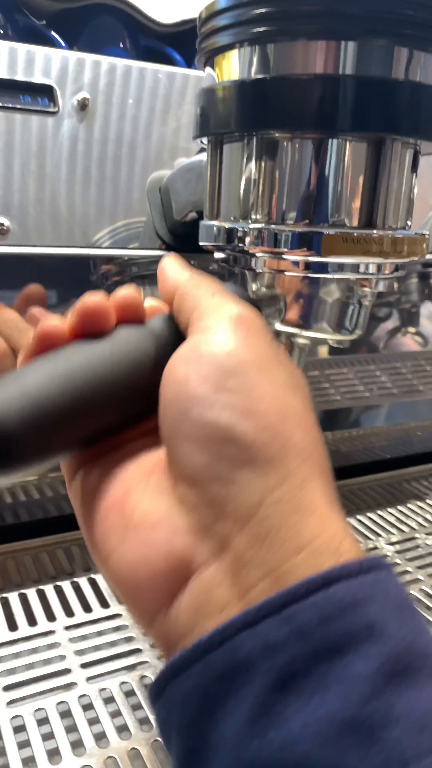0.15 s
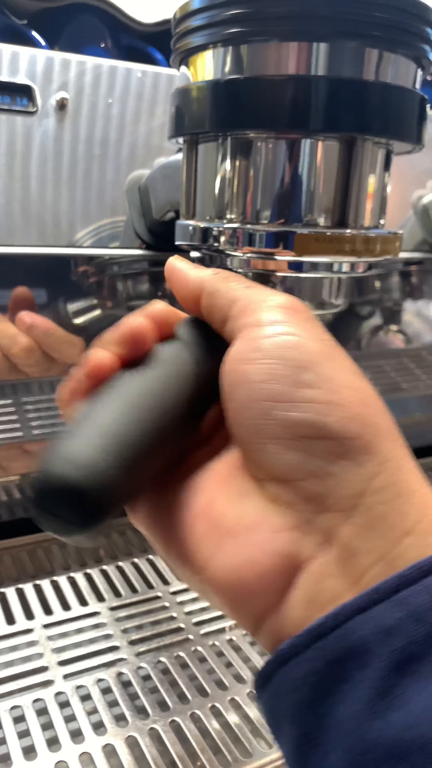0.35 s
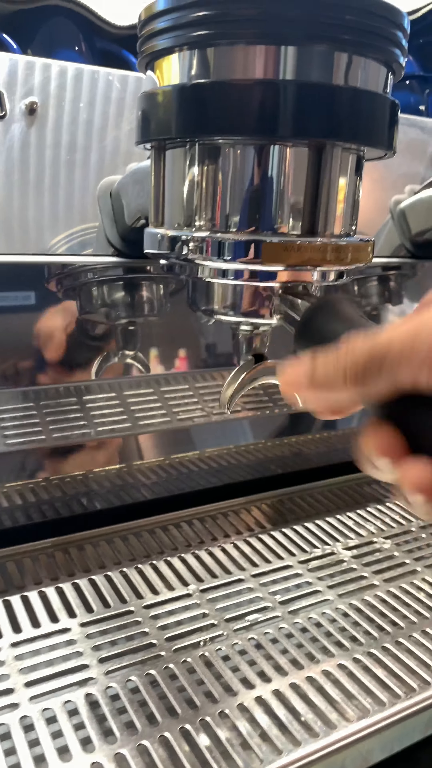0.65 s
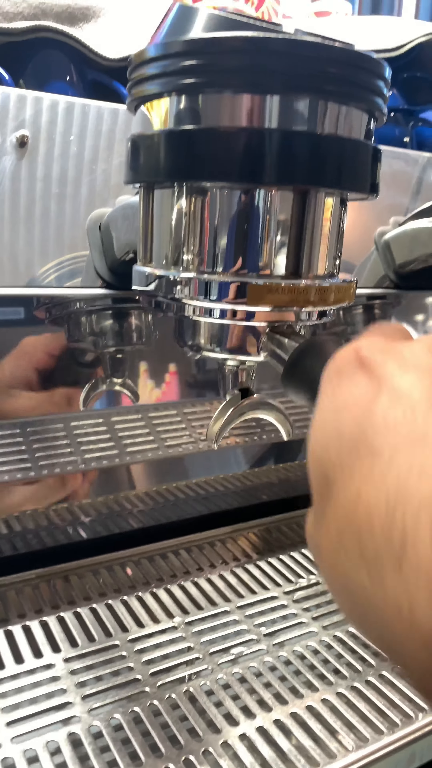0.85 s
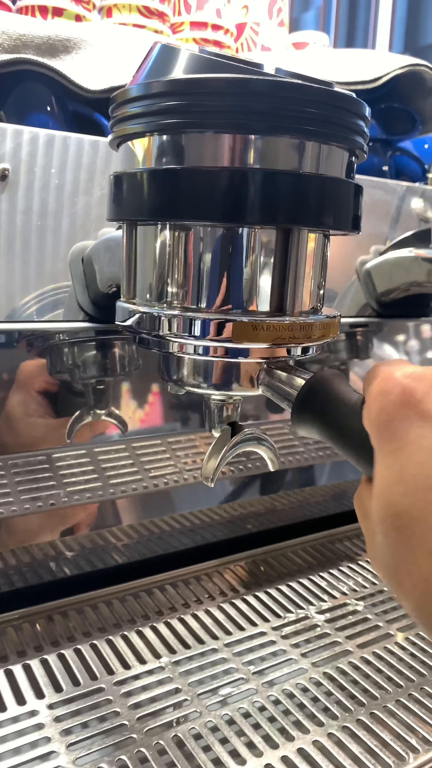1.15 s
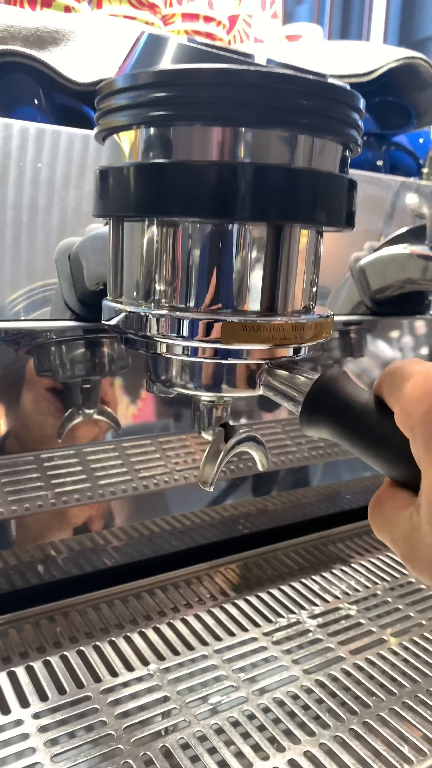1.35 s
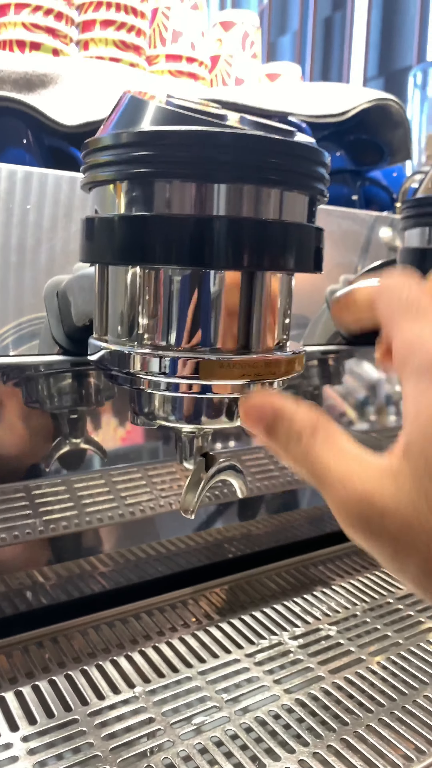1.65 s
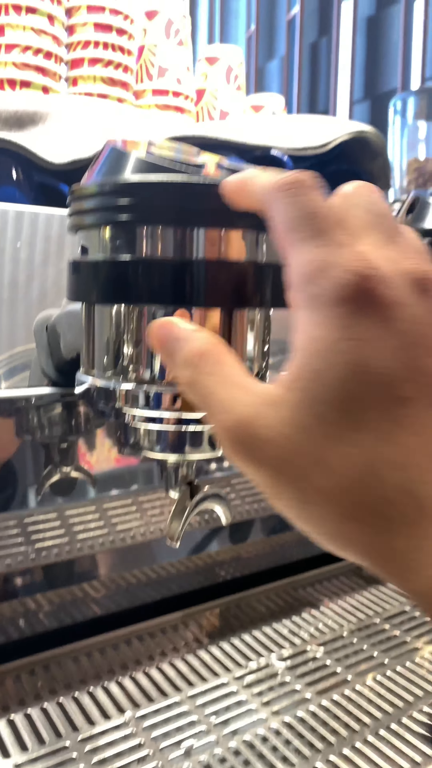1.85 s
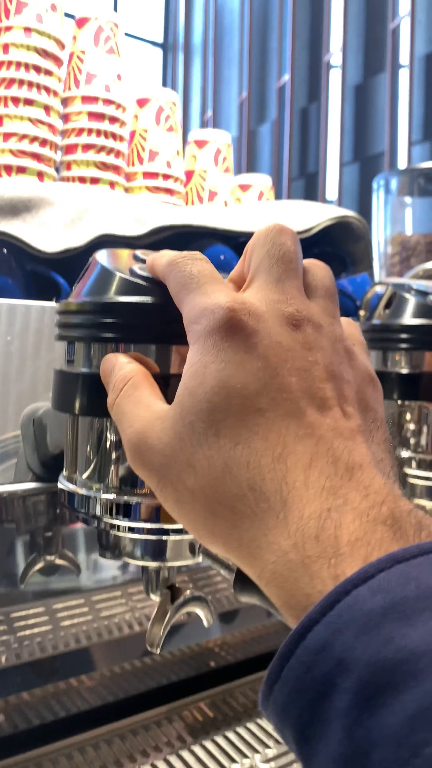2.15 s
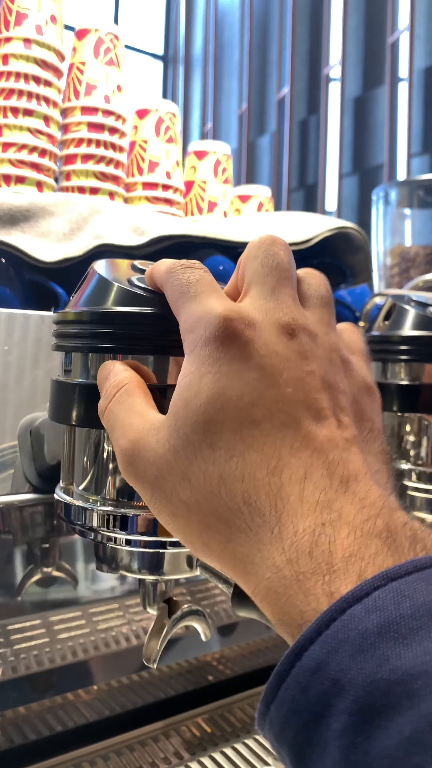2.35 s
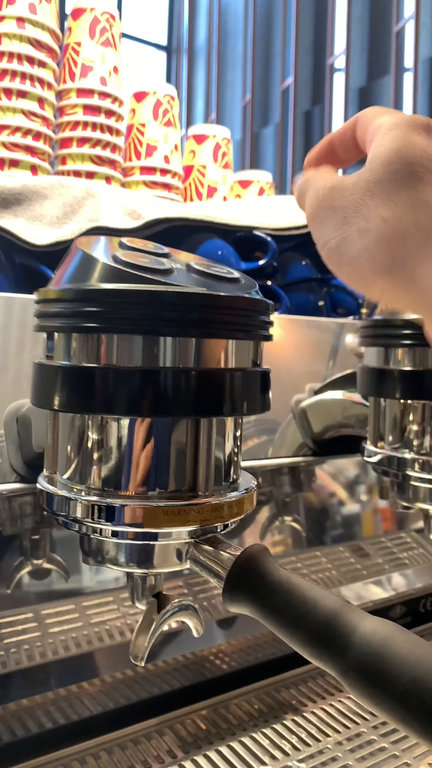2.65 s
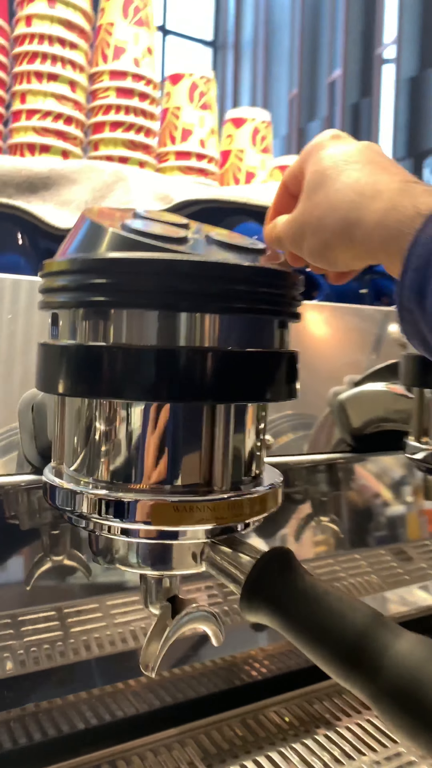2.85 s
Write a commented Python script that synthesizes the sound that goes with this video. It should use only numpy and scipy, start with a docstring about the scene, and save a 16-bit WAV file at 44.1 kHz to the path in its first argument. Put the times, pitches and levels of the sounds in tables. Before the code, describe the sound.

A metal portafilter clatters and grinds as it is twisted into an espresso machine, then near quiet over low cafe rumble, small button ticks, a loud valve snap and faint water hiss, heard close in stereo.

```python
"""Cafe: over a low rumble (coloured noise), a metal portafilter knocks and grinds into an espresso
machine's group head (struck modes, noise puffs, rough friction); its gasket squeaks faintly (gliding sines).
A finger taps and presses the brew button (noise ticks), the valve snaps open (modes, cracks, thuds)
and water hisses in the head (banded noise). A phone microphone pair hears it, the right side slightly first."""
import sys
import numpy as np
from scipy import signal
from scipy.fft import rfft, irfft, next_fast_len
from scipy.io import wavfile
from scipy.ndimage import uniform_filter1d

SR = 44100
rng = np.random.default_rng(int(sys.argv[2]) if len(sys.argv) > 2 else 0)


def volts_from_decibels(level):
    """Turn decibel levels (scalar or array-like) into linear amplitude factors."""
    exponent = np.asarray(level, float) / 20
    return 10 ** exponent


def dump(signal):
    """Clip the signal to [-1, 1] and save it as 16-bit WAV at the path in sys.argv[1]."""
    limited = np.clip(np.atleast_2d(signal).T, -1, 1)
    pcm = np.round(limited * 32767).astype(np.int16)
    wavfile.write(sys.argv[1], SR, pcm)


N = 132300  # 3 s


def evened(x):
    """Scales to rms 1."""
    return x / np.sqrt(np.mean(x ** 2) + 1e-20)


def read(points, hz):
    """Interpolates a (hz, value) table on a log-frequency axis."""
    point_hz, value = np.transpose(points)
    return np.interp(np.log(hz + 1), np.log(point_hz + 1), value)


def level(table, column):
    """Gain curve over the whole scene from a dB column, silent outside the table."""
    rows = np.array(table)
    return volts_from_decibels(np.interp(np.arange(N) / SR, rows[:, 0], rows[:, column], -150, -150))


def add(mix, start_s, sound):
    """Mixes a sound in at start_s."""
    part = mix[round(start_s * SR):][:len(sound)]
    part += sound[:len(part)]


# left-right likeness of spread-out noise: hz, likeness (0..1)
FAR_LIKENESS = [(60, 1), (250, .8), (400, 0.13), (600, 0.13), (1000, 0.099), (2000, .25), (5500, 0.1),
                (7500, 0.61), (9300, .98), (11000, .85), (14000, 1)]


def noise(colour, patchy_db):
    """Two-sided noise of rms 1: partly shared spectra, with level patches drifting in time and pitch."""
    frames, hz = N // 256 + 5, np.fft.rfftfreq(1024, 1 / SR)
    a, b, c, d, patches = rng.standard_normal((frames, 513, 5)).T
    patches = uniform_filter1d(patches, size=10, axis=0)
    patches = evened(uniform_filter1d(patches, size=10, axis=1))
    same = np.clip(read(FAR_LIKENESS, hz), -1, 1)[:, None]
    left = a + 1j * b
    right = same * left + np.sqrt(1 - same ** 2) * (c + 1j * d)
    gain = volts_from_decibels(read(colour, hz)[:, None] + patchy_db * patches)
    sound = signal.istft(np.array([left, right]) * gain, nperseg=1024, noverlap=768)[1]
    return evened(sound[:, :N])


def ring(modes, uneven_db, start_turns=0):
    """Decaying sines of the modes after one click, each struck more or less hard."""
    hz, db, t60_s = np.transpose(modes)[:, :, None]
    t = np.arange(SR // 4) / SR
    db = db + uneven_db * rng.standard_normal(db.shape)
    return (volts_from_decibels(db - 60 * t / t60_s) * np.sin(2 * np.pi * (hz * t + start_turns))).sum(0)


def blow(modes, contact_s, level_db):
    """Soft-edged contact ringing the modes; level_db is the rms of the first 10 ms."""
    sound = ring(modes, 2, rng.random((len(modes), 1)))
    sound = sound * (1 - np.exp(-np.arange(len(sound)) / SR / contact_s))
    return volts_from_decibels(level_db) * sound / np.sqrt(np.mean(sound[:441] ** 2))


def puff(colour, t60_s, level_db):
    """Crack of coloured noise: quick linear rise, steady decay."""
    rise_s = 0.0004
    t = np.arange(SR // 8) / SR
    spectrum = rfft(rng.standard_normal(len(t)))
    grain = irfft(spectrum * volts_from_decibels(read(colour, np.fft.rfftfreq(len(t), 1 / SR))), len(t))
    return volts_from_decibels(level_db - 60 * t / t60_s) * np.minimum(t / rise_s, 1) * evened(grain)


# cafe rumble spectrum: hz, relative_db_per_hz
RUMBLE_COLOUR = [(12, -67), (20, -35.5), (49, 3.5), (113, -5), (255, -15), (319, -15.5), (422, -21.5),
                 (678, -28.5), (759, -29), (1030, -31.5), (1530, -42), (1660, -38), (4180, -58.5),
                 (14300, -66.5), (16000, -80)]


def rumble():
    """Low cafe rumble: steady coloured noise at a set rms."""
    rumble_db = -39.5
    return volts_from_decibels(rumble_db) * noise(RUMBLE_COLOUR, 0.79)


# decay of the room: hz, t60_s
ROOM_T60 = [(250, .5), (1000, .5), (4000, .3), (12000, .15)]


def room(x):
    """Diffuse tail: noise with each band dying at its own speed."""
    hz, t, z = signal.stft(rng.standard_normal((2, SR // 2)), SR, nperseg=256)
    decay = volts_from_decibels(-60 * t / read(ROOM_T60, hz)[:, None])
    tail = signal.istft(z * decay, SR, nperseg=256)[1]
    return signal.fftconvolve(x[None], tail / np.linalg.norm(tail[0]), axes=1)[:, :N]


# left-right likeness of the near sources: hz, likeness (0..1)
NEAR_LIKENESS = [(100, .95), (400, .85), (800, 0.2), (1500, 0.2), (3000, 0.62), (5500, 0.21), (7000, 0.57),
                 (15000, 1)]


def spread(x):
    """Direct sound on both sides plus close steel reflections that differ left and right."""
    echo_decay_s = 0.0026
    size = next_fast_len(N + 2048)
    same = np.clip(read(NEAR_LIKENESS, np.fft.rfftfreq(size, 1 / SR)), 0, 1)
    echo = rng.standard_normal((2, 1024)) * np.exp(-np.arange(1024) / SR / echo_decay_s)
    echo = rfft(echo / np.linalg.norm(echo, axis=1)[:, None], size)
    return irfft(rfft(x, size) * (np.sqrt(same) + np.sqrt(1 - same) * echo), size)[:, :N]


# water hiss levels: time_s, low_db, mid_db, high_db, top_db
HISS_LEVELS = [(2.498, -48.5, -38, -50.5, -49), (2.52, -42, -50, -82, -57), (2.56, -61.5, -47.5, -52, -51),
               (2.6, -52.5, -47, -59.5, -63.5), (2.65, -55, -47, -65, -53), (2.69, -54.5, -46, -62, -52),
               (2.76, -55, -50.5, -67.5, -50.5), (2.845, -56, -55.5, -67, -53),
               (2.865, -55.5, -53, -60, -70), (2.93, -58, -60, -59, -71.5), (3.0, -54.5, -60, -54, -74)]
# spectra of the four hiss bands: hz, relative_db_per_hz
HISS_LOW_COLOUR = [(500, -18), (900, 1), (1500, -4), (2500, -2.5), (3300, -9.5), (4300, -19.5),
                   (5200, -19.5)]
HISS_MID_COLOUR = [(4500, -9.5), (5500, -3.5), (6500, 3), (7500, -2.5), (8500, -0.5), (9500, -9),
                   (10500, -31)]
HISS_HIGH_COLOUR = [(8500, -42), (9500, 1.5), (10900, 6), (11800, -16), (12600, -5), (13500, -38)]
HISS_TOP_COLOUR = [(11000, -38), (12300, 8), (13200, 4.5), (14200, 2.5), (15300, -17), (16300, -42.5)]


def hiss():
    """Water forced into the head: four noise bands, each with its own level curve."""
    colours = (HISS_LOW_COLOUR, HISS_MID_COLOUR, HISS_HIGH_COLOUR, HISS_TOP_COLOUR)
    return sum(noise(colour, 2.8) * level(HISS_LEVELS, k) for k, colour in enumerate(colours, 1))


# plunger strike and bounces: start_s, level_db
SNAP_HITS = [(2.496, -15.5), (2.4985, -13.5), (2.4998, -24), (2.5055, -28.5), (2.518, -50.5)]
# plunger modes: hz, relative_db, t60_s
VALVE_MODES = [(2400, -7.5, 0.019), (5530, -35, 0.01715), (5880, -11, 0.013994), (6510, 2.5, .035),
               (7600, 2.5, 0.018), (8940, -14.5, 0.0128), (10960, -4.5, .015)]
# crack spectrum of each hit: hz, relative_db_per_hz
CRACK_COLOUR = [(1200, -16.5), (2400, -8), (3500, -26), (4600, -26), (5600, -7.5), (6500, 2), (9000, -2),
                (11400, -4), (13000, -6.5), (15000, -13.5), (16300, -34.5)]
# plunger starting to move: start_s, level_db
PULL_PUFFS = [(2.48, -40), (2.487, -29.5), (2.491, -25)]
# its spectrum: hz, relative_db_per_hz
PULL_SPECTRUM = [(1000, -22), (2000, 1), (4000, -8), (6000, -2), (8000, -6), (9500, -38), (12000, -45)]
# coil thuds in the casing: start_s
THUD_STARTS = [2.4878, 2.492, 2.5, 2.503]
# one mode per thud: hz, level_db, t60_s
THUD_MODES = [(846, -21, .02), (1050, -35, 0.022), (319, -29, 0.067), (270, -42.5, 0.044)]


def valve():
    """The plunger starts to move, strikes and bounces (modes and cracks); the casing thuds."""
    contact_s, crack_db, crack_t60_s = 0.0008, 6.5, 0.017  # crack_db relative to the hit
    out = np.zeros(N)
    for start_s, level_db in SNAP_HITS:
        add(out, start_s, blow(VALVE_MODES, contact_s, level_db))
        add(out, start_s, puff(CRACK_COLOUR, crack_t60_s, level_db + crack_db))
    for start_s, level_db in PULL_PUFFS:
        add(out, start_s, puff(PULL_SPECTRUM, crack_t60_s, level_db))
    for start_s, mode in zip(THUD_STARTS, THUD_MODES):
        add(out, start_s, ring([mode], 0))
    return out


# small ticks of handle, button and valve: start_s, low_db, high_db, t60_s
TICK_HITS = [(1.36, -47.5, -80.5, .02), (1.507, -68.5, -69, 0.03083), (1.5618, -58.5, -54.5, 0.039),
             (2.3405, -56, -60, 0.02092), (2.369, -41, -37, 0.027), (2.455, -44, -49.5, 0.047),
             (2.4658, -60, -64, 0.02028), (2.6992, -36.5, -40, 0.12), (2.7344, -47.5, -53.5, .03),
             (2.8544, -50.5, -54, 0.044)]
# spectra of the two bands: hz, relative_db_per_hz
TICK_LOW_COLOUR = [(1200, -17), (2000, 1.5), (2600, 11), (3300, 6), (4500, -2.5), (6000, -8), (7500, -17.5)]
TICK_HIGH_COLOUR = [(5000, -24), (6500, -2), (9500, 4.5), (11500, -5), (14000, -11.5), (16300, -14.5)]


def ticks():
    """Dry plastic ticks: sharp noise puffs in a low and a high band."""
    out = np.zeros(N)
    for start_s, low_db, high_db, t60_s in TICK_HITS:
        add(out, start_s, puff(TICK_LOW_COLOUR, t60_s, low_db))
        add(out, start_s, puff(TICK_HIGH_COLOUR, t60_s, high_db))
    return out


# gasket squeaks: start_s, length_s, start_hz, end_hz, peak_db
SQUEAK_GLIDES = [(0.78, 0.043, 10000, 9760, -74), (.875, .015, 9800, 10200, -74),
                 (.925, .025, 10000, 9900, -69), (0.969, 0.014, 10300, 9600, -75),
                 (0.907, 0.096, 7960, 8160, -82), (.99, .04, 7200, 6764, -71)]


def squeaks():
    """Rubber on steel: thin sines gliding in pitch under a half-sine envelope."""
    out = np.zeros(N)
    for start_s, length_s, start_hz, end_hz, peak_db in SQUEAK_GLIDES:
        u = np.arange(0, 1, 1 / (length_s * SR))
        turns = np.cumsum(start_hz + (end_hz - start_hz) * u) / SR
        add(out, start_s, volts_from_decibels(peak_db) * np.sin(np.pi * u) * np.sin(2 * np.pi * turns))
    return out


# machine body modes, also rung by the knocks: hz, relative_db, t60_s
BODY_MODES = [(187, -13.5, 0.095), (226, -7.5, .08), (255, -4.5, 0.043), (295, -0.5, .07), (313, -7, 0.081),
              (353.3, 1.5, 0.059), (409, -5, .07), (470, -9, 0.07616), (675, -9, 0.1), (776, -12.5, .04),
              (930, -8, .08), (1030, -4.5, 0.067), (1216, -9.5, .05), (1348, -11, 0.13), (1417, -10.5, .05),
              (1535, -13.5, 0.11), (1590, -20, 0.11), (1860, -20.5, 0.056)]
# twisting friction: time_s, body_db, steel_db
GRIND_LEVELS = [(0, -40, -44.5), (.04, -42, -49.5), (.16, -38, -61), (.21, -32.5, -46.5),
                (.275, -29.5, -44), (.315, -42.5, -54), (.36, -32.5, -41), (.43, -37.5, -48.5),
                (.452, -46.5, -52), (.48, -35, -50.5), (.52, -36.5, -48.5), (.59, -36.5, -48),
                (.645, -37.5, -57), (.69, -47.5, -54.5), (.77, -50.5, -60), (.95, -60.5, -68),
                (1.15, -68, -87.5)]
# steel scrape spectrum: hz, relative_db_per_hz
SCRAPE_COLOUR = [(350, -34), (600, -6), (737, -13.5), (1030, -1.5), (1480, -7), (1730, -4.5), (4830, -25.5),
                 (7000, -45), (9100, -65), (15400, -120)]
# hand sliding on the handle: time_s, level_db
SLIDE_LEVELS = [(.2, -73.5), (.3, -78), (.42, -77.5), (.47, -69.5), (.54, -83.5), (.6, -63), (.645, -66),
                (.68, -57.5), (.72, -66), (.765, -73), (.8, -79.5), (1.0, -87.5)]
# its spectrum: hz, relative_db_per_hz
SLIDE_SPECTRUM = [(4000, -35.5), (6000, 1.5), (8000, 6), (10500, 3.5), (13000, -4), (15000, -0.5),
                  (16300, -10.5)]


def grind():
    """Rough sliding contact shakes the body and scrapes the steel; the hand slides on the handle."""
    slips = rng.standard_normal((2, N)) * volts_from_decibels(3.3 * rng.exponential(1, N))  # spiky, timed alike on both sides
    body = evened(signal.fftconvolve(slips, ring(BODY_MODES, 0)[None], axes=1)[:, :N])
    body = evened(body + 0.6 * body[::-1])  # sides partly blended
    scrape = noise(SCRAPE_COLOUR, 2.5) * level(GRIND_LEVELS, 2)
    slide = noise(SLIDE_SPECTRUM, 1.5) * level(SLIDE_LEVELS, 1)
    return body * level(GRIND_LEVELS, 1) + scrape + slide


# lugs knocking in the head: start_s, steel_db, struck_hz (steel mode hit hardest), treble_db, low_db, upper_db
KNOCK_HITS = [(0.1195, -47.5, 3300, -51.5, -35.5, -36), (.192, -33, 3500, -36.5, -37, -34),
              (0.2029, -34.5, 3000, -47.5, -31.5, -36.5), (0.2131, -31.5, 4900, -25, -33, -36.5),
              (0.2167, -33, 2500, -47.5, -38, -41), (.2265, -25.5, 3000, -41.5, -31, -33.5),
              (.243, -41.5, 1900, -56, -36.5, -34), (0.2496, -29, 3600, -41.5, -36, -38.5),
              (0.264, -55, 3000, -67.5, -28, -35.5), (0.278, -55.5, 3010, -64, -35.5, -42),
              (0.292, -55, 3000, -62, -35.5, -47.5), (0.3259, -36.5, 2400, -59.5, -39, -44),
              (0.3394, -24.5, 3000, -27, -33.5, -32.5), (0.3494, -45.5, 2400, -55.5, -35.5, -32),
              (.384, -37.5, 4800, -43, -36.5, -44.5), (0.4904, -22.5, 2800, -32, -36, -34),
              (0.4997, -30, 3000, -53, -35.5, -26.5), (0.552, -35, 3100, -36, -41.5, -37.5),
              (0.5764, -46.5, 2450, -67, -39, -40)]
# steel basket modes: hz, relative_db, t60_s
STEEL_MODES = [(2150, -4, .025), (2350, -18, 0.011), (2393, 4.5, .03), (2740, -4, 0.033), (3057, 16, 0.012),
               (3195, -9.5, .025), (3590, -1.5, 0.033), (4250, -7, 0.039), (4630, -1.5, 0.026),
               (4873, -4.5, .035), (5250, -24, .03), (5650, -2.5, .03)]
# treble crack spectrum: hz, relative_db_per_hz
RIM_COLOUR = [(5500, -13.5), (6800, -7), (8200, 1), (9000, 0.5), (10300, -4), (12000, -14), (13500, -6),
              (15000, -14), (16300, -29)]
# gritty scrape spectrum: hz, relative_db_per_hz
GRIT_COLOUR = [(500, -10.5), (1000, 3.5), (2500, 3.5), (3300, -3), (5000, -10), (6200, -32.5)]
# thin ring of the basket: start_s, hz, level_db, t60_s
BASKET_RING = [(.12, 10900, -58, .15)]


def knocks():
    """Each knock rings the steel basket around struck_hz, cracks, scrapes and shakes the body."""
    steel_contact_s, body_contact_s, upper_hz = 0.0011, 0.0018, 550
    fall_db_per_octave = 18  # away from struck_hz
    rim_t60_s, grit_t60_s, grit_db = 0.031, 0.068, -5  # grit_db relative to the steel
    low = [m for m in BODY_MODES if m[0] < upper_hz]
    upper = [m for m in BODY_MODES if m[0] > upper_hz]
    out = np.zeros(N)
    for start_s, steel_db, struck_hz, treble_db, low_db, upper_db in KNOCK_HITS:
        steel = [(hz, db - fall_db_per_octave * abs(np.log2(hz / struck_hz)), t60_s)
                 for hz, db, t60_s in STEEL_MODES]
        add(out, start_s, blow(steel, steel_contact_s, steel_db))
        add(out, start_s, blow(low, body_contact_s, low_db))
        add(out, start_s, blow(upper, body_contact_s, upper_db))
        add(out, start_s, puff(RIM_COLOUR, rim_t60_s, treble_db))
        add(out, start_s, puff(GRIT_COLOUR, grit_t60_s, steel_db + grit_db))
    for start_s, *mode in BASKET_RING:
        add(out, start_s, ring([mode], 0))
    return out


def scene():
    """All sources in the cafe; the near ones also feed the room."""
    room_db = -19.5
    near = knocks() + squeaks() + ticks() + valve()
    return spread(near) + volts_from_decibels(room_db) * room(near) + grind() + hiss() + rumble()


def top_cut(x):
    """Nothing passes above the cut-off."""
    return signal.sosfilt(signal.butter(12, 16420, fs=SR, output="sos"), x)


# level of right over left: hz, right_db
RIGHT_LEVEL = [(60, 1.5), (300, 4.5), (700, -1), (2000, 0), (3300, 1), (5500, 3), (7500, 0.5), (16000, -1)]
# further phase lead of the right side: hz, lead_rad
RIGHT_TURN = [(30, -.1), (100, -.15), (300, -.7), (450, -1.5), (650, -2.5), (820, -2.2), (1000, 0),
              (2500, 0), (3000, -.7), (4200, 0), (16000, 0)]


def record(dry):
    """Microphone pair: the right side leads and differs in level by band; low cut and band limit."""
    right_lead_s, low_cut_hz, edge_hz = 0.000214, 50.5, 16300
    size = next_fast_len(N + 2048)
    hz = np.fft.rfftfreq(size, 1 / SR)
    lead_rad = 2 * np.pi * hz * right_lead_s + read(RIGHT_TURN, hz)
    half = volts_from_decibels(read(RIGHT_LEVEL, hz) / 2) * np.exp(0.5j * lead_rad)  # half the difference to each side
    band = (hz < edge_hz) / np.sqrt(1 + (low_cut_hz / (hz + 1)) ** 8)
    pair = irfft(rfft(dry, size) * [1 / half, half] * band, size)[:, :N]
    return top_cut(pair)


dry = scene()
out = record(dry)
dump(out)
```